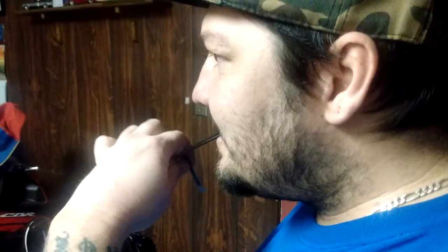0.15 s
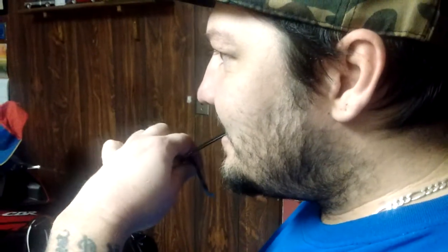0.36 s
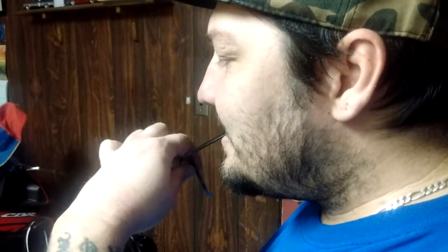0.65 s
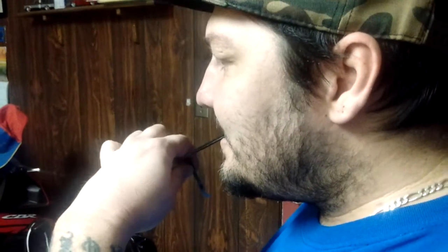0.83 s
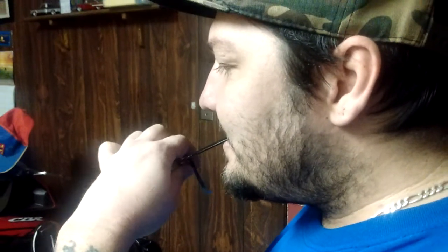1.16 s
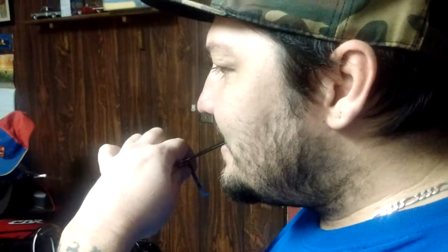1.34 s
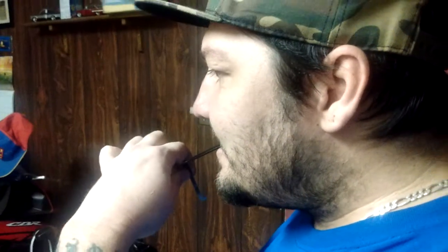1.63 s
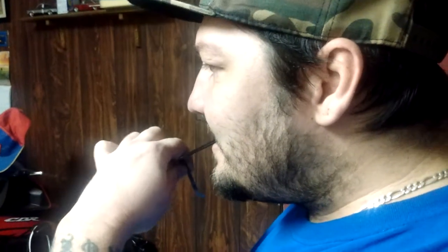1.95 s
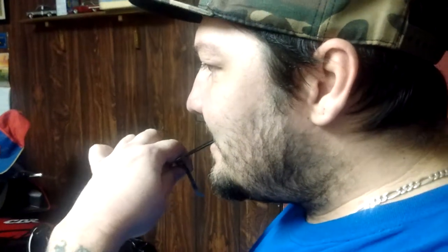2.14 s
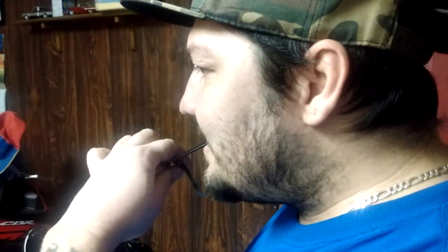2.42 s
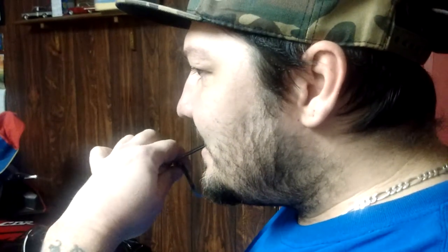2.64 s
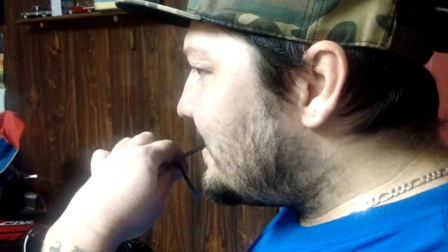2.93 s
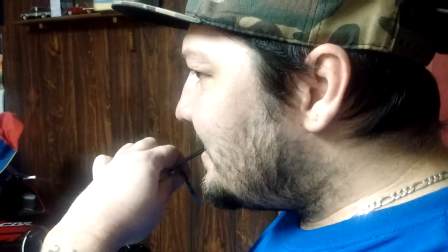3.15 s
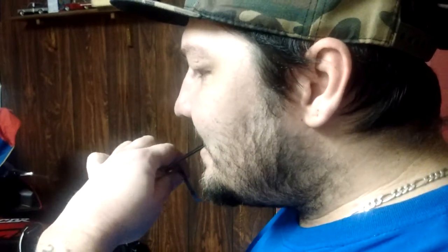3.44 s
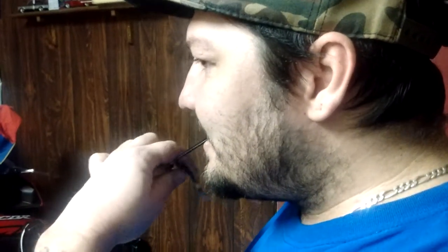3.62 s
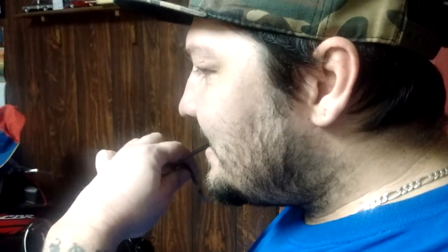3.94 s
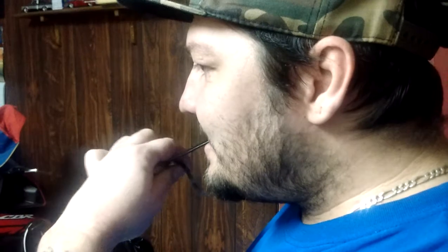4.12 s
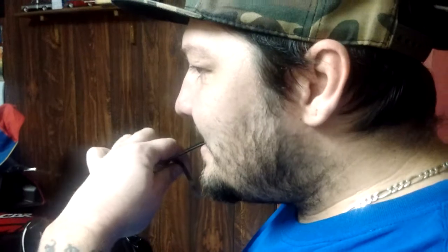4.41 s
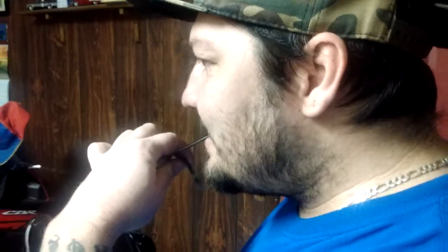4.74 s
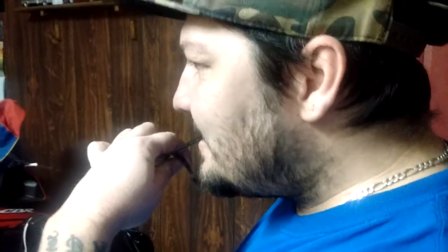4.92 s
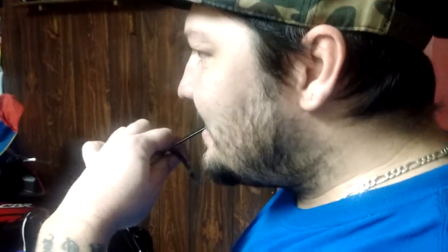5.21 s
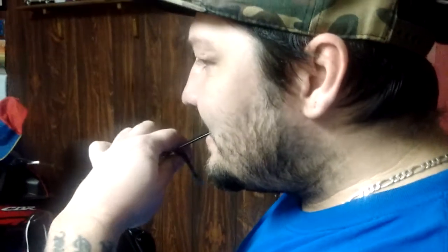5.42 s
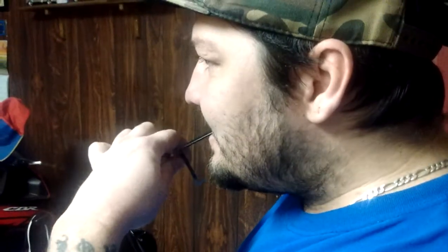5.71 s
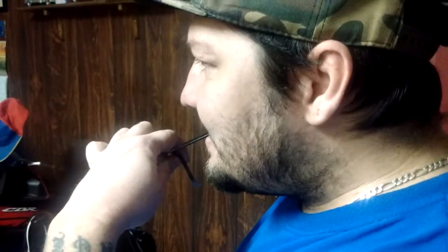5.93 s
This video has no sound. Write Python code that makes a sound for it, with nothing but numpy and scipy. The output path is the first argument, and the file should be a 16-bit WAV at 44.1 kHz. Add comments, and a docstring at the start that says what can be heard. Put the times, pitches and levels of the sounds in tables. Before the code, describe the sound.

A steady fan-like low drone and soft hiss fill a small quiet room throughout, the bass wide between left and right. Close by, steel tools work inside a hand-held padlock. A barely audible scrape opens, then a thin bright double tick at 0.26 s. At 0.88 s comes the loudest sound, a hard double snap, chattering for a millisecond or two with a faint steel ring; the room noise dips and slowly swells back. Faint ticks follow at 2.05, 2.27 and 2.48 s. A tiny tick at 3.15 leads to a second strong, bright snap at 3.17 s, then a short gritty scrape at 3.28. Lighter clicks come at 3.5, 3.7 and 4.27 s, the last crisp, with very faint ticks from 4.6 to 5 s. Near 5.4 s a brief double scrape carries a duller click; only drone and hiss remain. Reflections are short and close.

```python
"""Steady drone and hiss of a small quiet room, then short steely clicks and brief scrapes, close by.
A pick and a tension wrench work the pins of a hand-held padlock in front of a recorder with two ports.
Clicks are chattering contacts coloured by steel resonances; scrapes are gritty noise; both reflect off
near walls. Shafts and lock body ring after each click. Shaped noise makes the room's drone and hiss.
The recorder's gain control ducks quickly at loud snaps, holds, then recovers slowly."""
import sys
import numpy as np
from scipy import signal
from scipy.fft import rfft, irfft
from scipy.io import wavfile
from scipy.ndimage import uniform_filter1d, minimum_filter1d

SR = 44100
rng = np.random.default_rng(int(sys.argv[2]) if len(sys.argv) > 2 else 0)


def store_wav(level_fs):
    """Save 16-bit WAV to argv[1]."""
    pcm = np.round(np.clip(np.atleast_2d(level_fs), -1, 1) * 32767)
    wavfile.write(sys.argv[1], SR, pcm.T.astype(np.int16))


N = 267731  # length of the scene [samples]

# room noise common to both ports: (frequency [Hz], relative density [dB])
COMMON_NOISE = [(20, -12), (55, -2.5), (95, 2), (150, -4.5), (310, -7.5), (450, -4.5), (700, -5.5),
                (1100, -0.5), (1950, -6.5), (3100, -20), (4200, -16.5), (5300, -21), (6400, -32),
                (8000, -19), (9500, -25), (15450, -26.5), (15800, -65)]
# room noise opposed between the ports: (frequency [Hz], relative density [dB])
OPPOSED_NOISE = [(20, -14), (42, -6), (60, -5.5), (95, 0.5), (150, -8), (310, -12), (440, -13), (650, -18),
                 (1050, -24.5), (1500, -37), (2000, -35), (3500, -33.5), (4800, -47.5), (6600, -43.5),
                 (8100, -47.5), (9200, -43), (11000, -47.5), (15450, -48), (15800, -85)]
# resonances in the room's drone: (frequency [Hz], width [Hz], level [dB])
DRONE_PEAKS = [(404, 25, 6.5), (453, 11, 3.5), (500, 38, 5.5), (689, 30, 4.5), (768, 4.5, 7),
               (824, 86, 2.5), (1034, 25, 5.5)]
# likeness of common to opposed noise, which leans the room noise left: (frequency [Hz], correlation [0-1])
NOISE_LEAN = [(100, 0.76), (450, 0.69), (1000, 0.52), (2000, 0.37), (8000, 0), (14000, 0.22)]
# reverberation of the small room: (frequency [Hz], t60 [s])
ROOM_DECAY = [(500, 0.19), (3000, 0.28), (8000, 0.18), (15000, 0.15)]
# the pick sliding in the keyway: (start [s], push length [s], level [dB], brightness [dB per octave])
SCRAPES = [(0.015, .01, -56, 9), (0.371, .01, -57, 5), (0.816, .03, -63, 10), (1.135, .015, -61, 10),
           (3.2844, 0.021, -41.5, -0.5), (4.323, 0.017, -58.5, 15), (5.385, 0.04, -54, -2),
           (5.430, 0.0087, -51, 0.5)]
# spectrum of the sliding pick: (frequency [Hz], relative density [dB])
SCRAPE_COLOUR = [(400, -18), (800, 16.5), (1250, 13), (1550, 4), (1800, 15.5), (2250, 10.5), (2520, 14.5),
                 (3100, -5), (3750, 12.5), (4300, -2), (5100, 3), (5900, 5.5), (6600, -6), (8200, 3.5),
                 (9500, -8), (12000, -20), (16000, -40)]
# pin clicks: (time [s], force [dB], brightness [dB per octave], mid treble [dB], low crack [dB],
#              chatter time [s], ping of the struck part [Hz], ping [dB], lock body [dB], room send [dB])
PIN_CLICKS = [(0.2553, -31, -4, 0, 0, .0004, 8400, 0, -40, -14),
              (0.2575, -19, 3.5, 9, 10, 0.00043, 10200, 9, -29, -12),
              (0.8807, -3, -1, -0.5, -3.5, .0008, 4680, 9, -31, -11),
              (0.8833, -9.5, 2.5, -3, 2, 0.00089, 13000, 0, -28, -14),
              (2.0507, -31, -1, -4, -4, 0.00065, 3800, 6, -40, -14),
              (2.2725, -37, -6, 0, -4, .0005, 4400, -2, -40, -14),
              (2.4833, -26.5, -3, -1, -2, 0.00093, 3830, 5, -40, -7),
              (3.152, -36, 1, 3, -4, .0006, 8400, 0, -40, -16),
              (3.1730, -9.5, 1, 2, -3, .00075, 12900, 4.5, -48, -13),
              (3.5072, -39, 3, 2, -6, .0004, 13000, 2, -40, -14),
              (3.7137, -23, -.5, -4, 3, 0.00056, 13020, 5, -40, -16),
              (4.273, -19, 0.5, -4.5, -3, 0.00032, 5000, 7, -43, -19),
              (4.6325, -34, -2, 7, -4, 0.00058, 3800, 2, -40, -18),
              (4.85, -34, 0, -4, -4, .0004, 13000, 2, -40, -14),
              (4.9558, -38, -7, -6, -4, 0.00057, 4400, 4, -40, -14),
              (5.341, -35, -7, -4, 0, .0005, 13000, 2, -40, -14),
              (5.445, -24.5, -3.5, -6, -5, 0.00059, 12750, 6, -40, -8)]
# broad resonances of pick, wrench and pins: (frequency [Hz], width [Hz], level [dB])
STEEL_PEAKS = [(3590, 650, 9.5), (4460, 500, 5.5), (5120, 350, 5.5), (5700, 480, 7), (7380, 880, 7),
               (8700, 540, 10), (10900, 560, 3.5), (11900, 490, 6.5), (13070, 750, 11), (14900, 900, 2.5)]
# faint lasting ring of the thin steel shafts: (frequency [Hz], level [dB], t60 [s])
SHAFT_MODES = [(3600, -1, .08), (4415, 3, .13), (4800, -3, .09), (5500, -3, .1), (6740, -9, .07),
               (7390, -7, .1), (8600, -7, .1), (9975, -9, .07), (10750, -3, .08), (12340, -6, .1),
               (13020, -9, .06)]
# the lock body, damped by the hand: (frequency [Hz], level [dB], t60 [s])
BODY_MODES = [(1165, 0, .085), (1440, -9, .04), (2050, -4, .015)]
# the case shades the right port, most in the top treble: (frequency [Hz], left minus right [dB])
CASE_SHADE = [(1000, 2), (5000, 4.5), (8500, -2), (11000, 10), (13000, 10), (15000, 34)]

COMMON_DB, OPPOSED_DB = -49, -38  # rms of each part of the room noise
SCRAPE_ATTACK_S, SCRAPE_RELEASE_S = 0.0045, 0.007
DRAG_DB, DRAG_FADE_DB_PER_S = -8, 124  # the light drag after a push
PIVOT_HZ, CRACK_HZ = 8700, 2800  # a click's tilt turns about the first; its low crack lies below the second
MID_TREBLE_HZ, MID_WIDTH_HZ = 9500, 6000
PORT_DELAY_S = 0.000318  # lock to right port, later than to the left
HOLD_S, RECOVERY_DB_PER_S = 0.16, 11  # gain control
EDGE_HZ = 16300  # top of the recorded band


def gain_of(db):
    """Decibels to amplitude."""
    return 10 ** (np.asarray(db) / 20)


def evened(x):
    """Scales to rms 1."""
    return x / np.sqrt(np.mean(x ** 2) + 1e-20)


def read(points, hz):
    """Reads a table along a log-frequency axis."""
    f, value = np.transpose(points)
    return np.interp(np.log(hz + 1), np.log(f + 1), value)


def humps(peaks, hz):
    """Level in dB of a set of bell-shaped resonances."""
    return sum(db * np.exp(-2 * ((hz - f) / width) ** 2) for f, width, db in peaks)


def add(mix, s, sound):
    """Adds a sound into the mix at time s."""
    part = mix[round(s * SR):][:len(sound)]
    part += sound[:len(part)]


def noise(colour, size):
    """Noise of rms 1 with a given colour."""
    hz = np.fft.rfftfreq(size, 1 / SR)
    spectrum = rfft(rng.standard_normal(size)) * gain_of(read(colour, hz))
    return evened(irfft(spectrum, size))


def room_noise():
    """A fan-like drone and hiss; the bass reaches the two ports in opposite phase and leans left."""
    hz = np.fft.rfftfreq(N, 1 / SR)
    lean = read(NOISE_LEAN, hz)
    drone_db = humps(DRONE_PEAKS, hz)
    a, b = rfft(rng.standard_normal((2, N)))
    shared = lean * a + np.sqrt(1 - lean ** 2) * b  # partly alike with the opposed noise
    common = evened(irfft(shared * gain_of(read(COMMON_NOISE, hz) + drone_db), N))
    opposed = evened(irfft(a * gain_of(read(OPPOSED_NOISE, hz) + drone_db), N))
    return gain_of(COMMON_DB) * common + gain_of(OPPOSED_DB) * np.array([opposed, -opposed])


def room(x, first_s=0.0044, near_db=2, near_s=0.0068, dull_hz=13000):
    """Dense reflections from near walls, strongest at first, dull above 13 kHz."""
    t = np.arange(SR // 2) / SR
    hz, frame_s, z = signal.stft(rng.standard_normal((2, len(t))), SR, nperseg=256)
    decay = gain_of(-60 * frame_s / read(ROOM_DECAY, hz)[:, None])
    tail = signal.istft(z * decay, SR, nperseg=256)[1][:, :len(t)]
    tail = tail * (t > first_s) * (1 + gain_of(near_db) * np.exp(-t / near_s))
    tail = signal.sosfilt(signal.butter(4, dull_hz, fs=SR, output="sos"), tail)
    tail = tail / np.linalg.norm(tail, axis=1, keepdims=True)
    return signal.fftconvolve(x[None], tail, axes=1)[:, :N]


def scrapes(grain_db=4.0):
    """Short, gritty slides of the pick: each bites, holds, lets go and drags to rest."""
    out, t = np.zeros(N), np.arange(8192) / SR
    for start_s, push_s, level_db, tilt_db in SCRAPES:
        after = np.maximum(t - push_s, 0)
        drag = gain_of(DRAG_DB - DRAG_FADE_DB_PER_S * after)
        release = np.maximum(np.exp(-after / SCRAPE_RELEASE_S), drag)
        pressure = np.clip(t / SCRAPE_ATTACK_S, 0, 1) * release
        grit = np.tanh(evened(uniform_filter1d(rng.standard_normal(len(t)), size=40)))
        colour = [(hz, db + tilt_db * np.log2(hz)) for hz, db in SCRAPE_COLOUR]
        rub = noise(colour, size=len(t))
        add(out, start_s, pressure * gain_of(level_db + grain_db * grit) * rub)
    return out


def ring(modes, t):
    """Struck metal modes: sines in random phase, each dying at its own rate."""
    total = np.zeros(len(t))
    for hz, db, t60 in modes:
        total += gain_of(db - 60 * t / t60) * np.sin(2 * np.pi * (hz * t + rng.random()))
    return total


def causal(colour_db):
    """Minimum-phase frequency response with this colour, which rings only after the blow."""
    log_gain = np.log(gain_of(np.concatenate([colour_db, colour_db[-2:0:-1]])))
    return np.exp(np.conj(signal.hilbert(log_gain)))[:len(colour_db)]


def click_colour(hz, tilt_db, middle_db, low_db, ping_hz, ping_db, ping_width_hz=400, lowest_hz=600):
    """The steel's resonances; where the pick touches tilts them, shapes the middle and sets one part's ping."""
    touch = humps([(MID_TREBLE_HZ, MID_WIDTH_HZ, middle_db), (ping_hz, ping_width_hz, ping_db)], hz)
    tilt = tilt_db * np.log2(np.maximum(hz, CRACK_HZ) / PIVOT_HZ)
    low_crack = low_db / (1 + (hz / CRACK_HZ) ** 10)
    bass_cut = 20 * np.log10(1 + (lowest_hz / (hz + 20)) ** 2)
    return humps(STEEL_PEAKS, hz) + touch + tilt + low_crack - bass_cut


def click(t, colour_db, chatter_s, crack_db=-9):
    """Metal cracks against metal and chatters for a millisecond or two, driving all the resonances evenly."""
    chatter = evened(rng.standard_normal(len(t)) * t * np.exp(-t / chatter_s))
    crack = evened(signal.unit_impulse(len(t), round(chatter_s * SR)))
    # only the phase is kept, so the contact drives every frequency alike
    contact = np.exp(1j * np.angle(rfft(chatter + gain_of(crack_db) * crack)))
    return irfft(contact * causal(colour_db)) * (1 - t / t[-1]) ** 2


def pins(shafts_db=-44.5, ring_rise_s=0.00091):
    """All the clicks, and what they send into the room; each leaves the shafts and the lock body ringing."""
    direct, sent, t = np.zeros(N), np.zeros(N), np.arange(8192) / SR
    hz = np.fft.rfftfreq(len(t), 1 / SR)
    for (s, force_db, tilt_db, middle_db, low_db, chatter_s,
         ping_hz, ping_db, body_db, room_db) in PIN_CLICKS:
        colour_db = click_colour(hz, tilt_db, middle_db, low_db, ping_hz, ping_db)
        snap = click(t, colour_db, chatter_s)
        ringing = gain_of(shafts_db) * ring(SHAFT_MODES, t) + gain_of(body_db) * ring(BODY_MODES, t)
        ringing *= 1 - np.exp(-t / ring_rise_s)
        sound = gain_of(force_db) * (snap + ringing)
        add(direct, s, sound)
        add(sent, s, gain_of(room_db) * sound)
    return direct, sent


def ports(x):
    """The right port hears the lock later, shaded by the case and in opposite polarity."""
    hz = np.fft.rfftfreq(N, 1 / SR)
    right = -gain_of(-read(CASE_SHADE, hz)) * np.exp(-2j * np.pi * hz * PORT_DELAY_S)
    same_power = np.sqrt(2 / (1 + abs(right) ** 2))  # the pair's total power stays even over frequency
    pair = np.array([np.ones_like(right), right]) * same_power
    return irfft(rfft(x) * pair, N)


def scene(scrape_room_db=-10.5):
    """The lock close by, its reflections, and the room noise."""
    clicks, sent = pins()
    slides = scrapes()
    reflections = room(sent + gain_of(scrape_room_db) * slides)
    return ports(clicks + slides) + reflections + room_noise()


def record(dry, threshold_db=-28.0, attack_s=0.00044):
    """Gain control ducks fast above a threshold, holds, and recovers slowly; then the band limit."""
    power = signal.lfilter(np.ones(220) / 220, [1], (dry ** 2).mean(0))  # 5 ms running mean
    power_db = 10 * np.log10(power + 1e-12)
    half = int(HOLD_S * SR / 2)
    held_db = -minimum_filter1d(-power_db, 2 * half + 1, origin=half, mode="nearest")  # recent peak
    fall = np.arange(N) / SR * RECOVERY_DB_PER_S
    envelope_db = np.maximum.accumulate(held_db + fall) - fall
    over_db = np.maximum(envelope_db - threshold_db, 0)
    keep = np.exp(-1 / (attack_s * SR))
    duck_db = signal.lfilter([1 - keep], [1, -keep], over_db)
    ducked = dry / gain_of(duck_db)
    band = signal.firwin(255, EDGE_HZ, window=("kaiser", 9), fs=SR)
    return signal.oaconvolve(ducked, band[None], "same")


dry = scene()
out = record(dry)
store_wav(out)
```